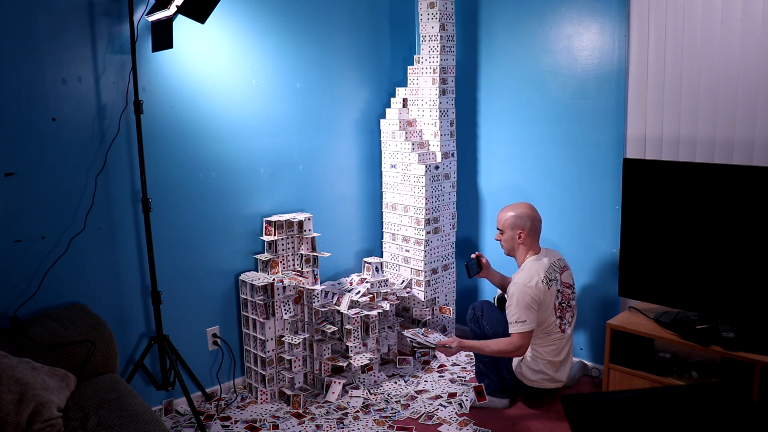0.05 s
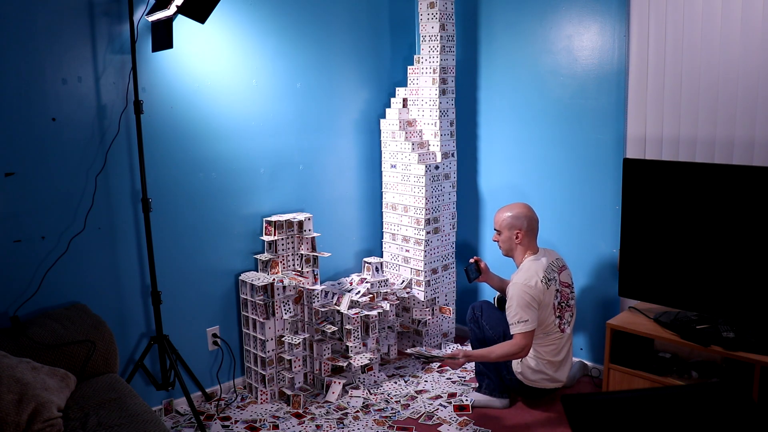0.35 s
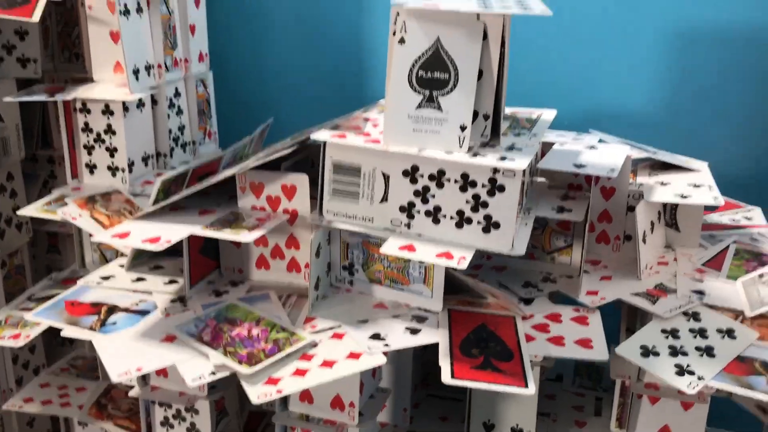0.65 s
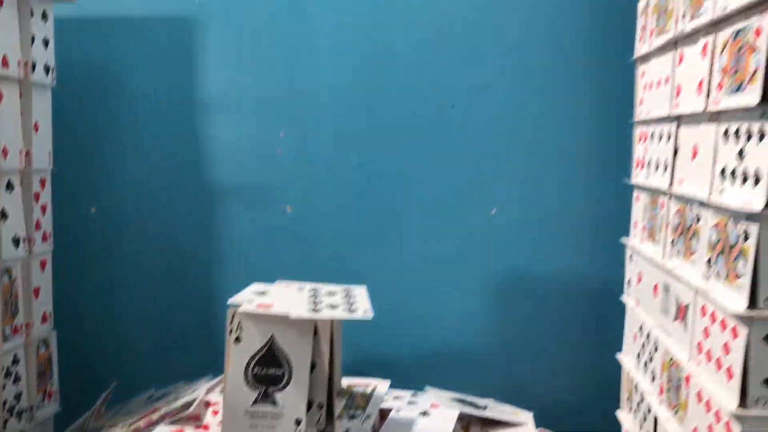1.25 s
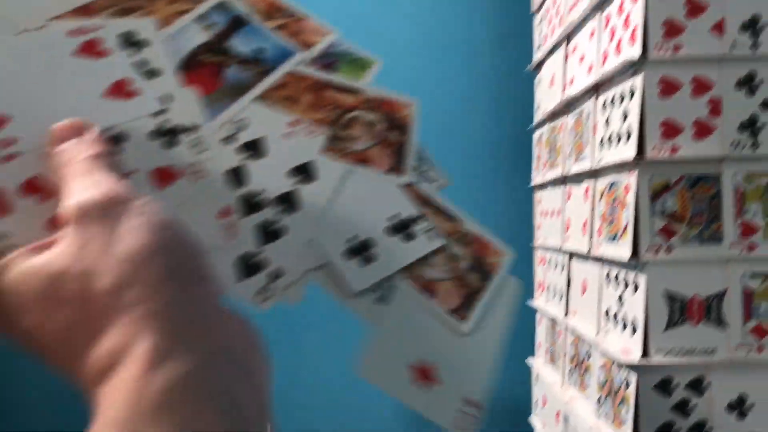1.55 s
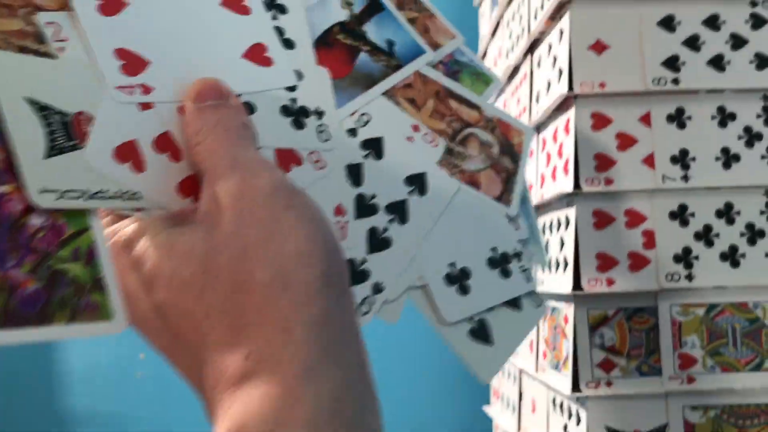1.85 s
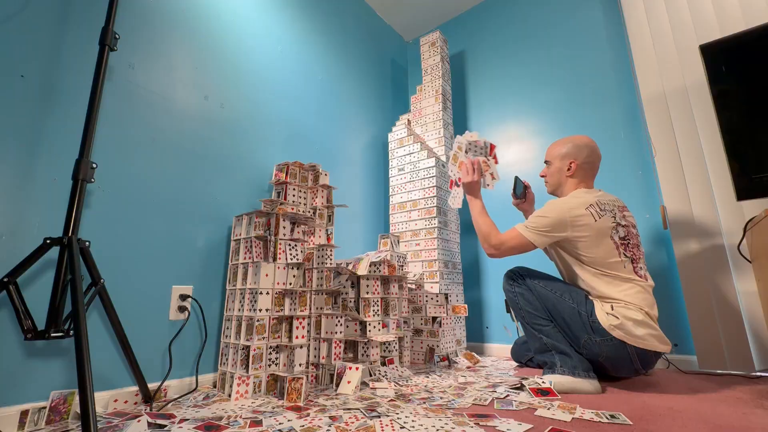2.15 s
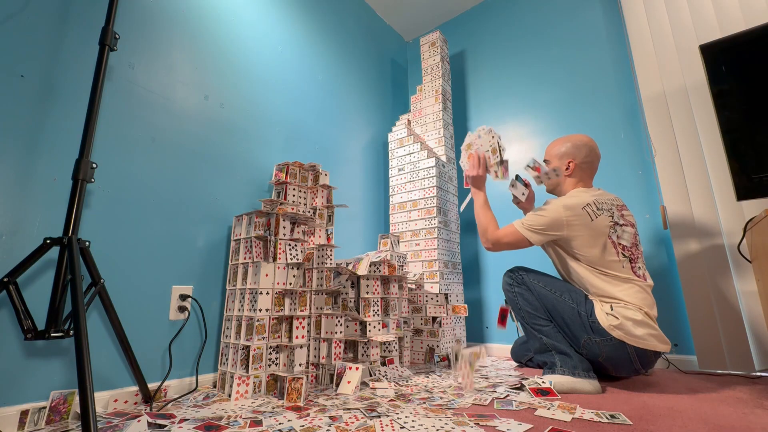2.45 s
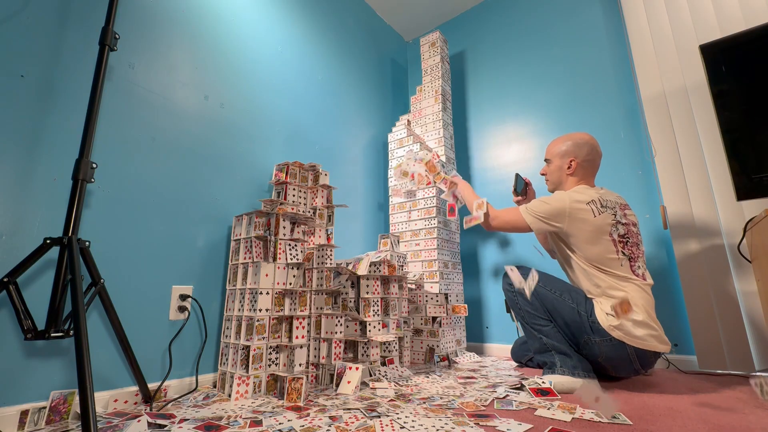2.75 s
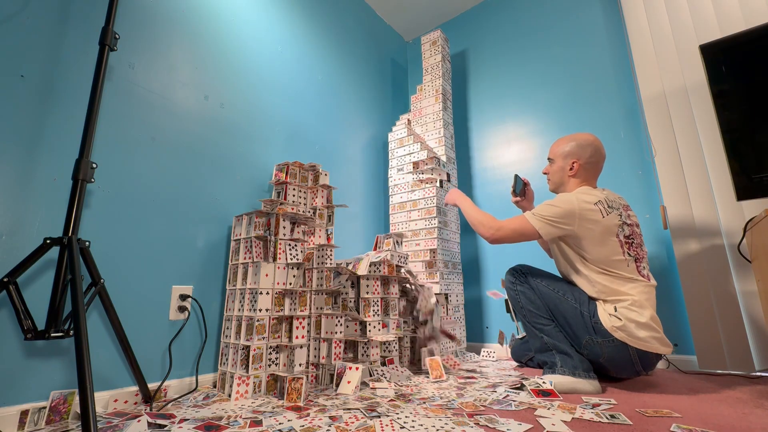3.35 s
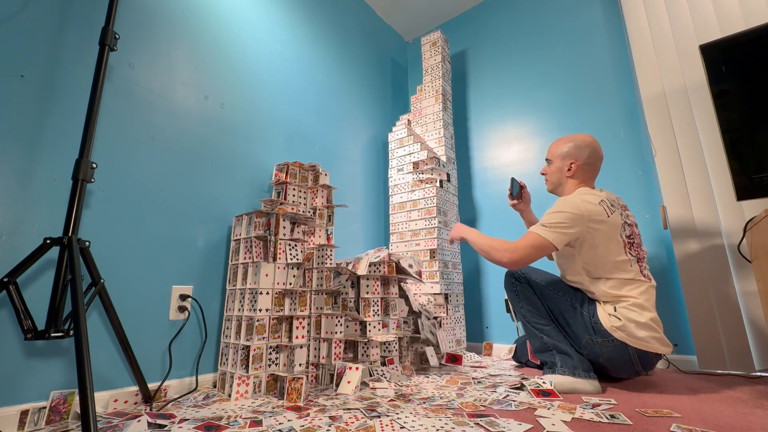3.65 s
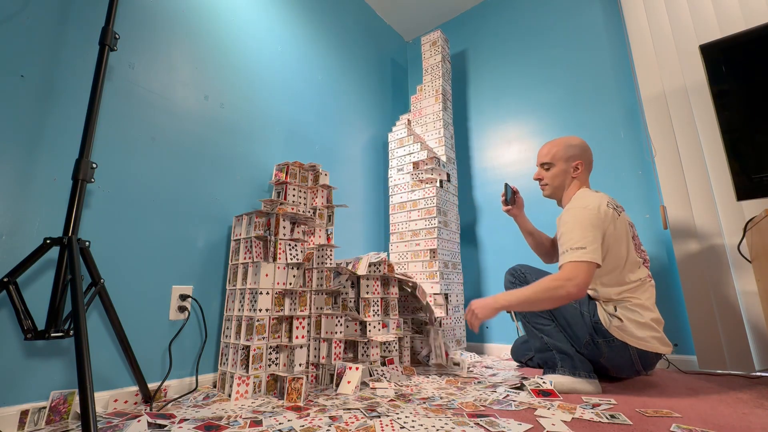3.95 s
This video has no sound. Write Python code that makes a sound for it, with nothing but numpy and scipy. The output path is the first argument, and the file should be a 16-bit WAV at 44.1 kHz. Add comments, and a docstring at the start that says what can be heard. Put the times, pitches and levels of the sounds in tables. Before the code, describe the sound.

Playing cards fall from a tall card house, starting with a short tapping spill that dies by 0.4 seconds. From about 1.3 seconds, cards rustle softly in a hand. A few tick and slap down from 2.2 seconds, with two thuds on the floor. From 2.7 seconds, a dense clatter of sharp clicks continues to the end at 4 seconds. The small room has a faint rumble and hum.

```python
"""Playing cards spill off a tall house of cards in a small, quiet room.
0-0.4 s: a short spill of tapping, clacking cards dies away. From 1.3 s: a fan of cards rustles
in the hand, card slipping on card. From 2.2 s: a few cards tick and slap down; two heavy
landings ring the floor. From 2.7 s: a whole storey gives way, stiff cards striking edge first
in a dense clatter. Throughout: low room rumble, faint hiss and hum."""
import sys
import numpy as np
from scipy import signal
from scipy.fft import rfft, irfft
from scipy.io import wavfile

SR = 44100
rng = np.random.default_rng(int(sys.argv[2]) if len(sys.argv) > 2 else 0)


def to_wav(sig):
    """Store sig (one row per channel, or 1-D mono) as 16-bit WAV at the path in sys.argv[1].

    Samples outside -1..1 are clipped; the rate is SR.
    """
    pcm = np.clip(np.atleast_2d(sig), -1, 1) * 32767
    pcm = np.round(pcm).astype(np.int16)
    wavfile.write(sys.argv[1], SR, pcm.T)  # frames by channels


N = 176400
TIME_S = np.arange(N) / SR

# single card strikes: start_s, rattle_s, relative_db, body_db, edge_db
CLACKS = [(0.048, 0.0058, -31.5, 5, -11), (0.063, 0.0059, -45, 4, -4), (0.097, 0.002, -45, -9, 2),
          (0.117, 0.0087, -32, 5.5, -3), (0.135, 0.0068, -31.5, -6, -4.5), (0.161, 0.0039, -25.5, -2, -10),
          (0.189, 0.0044, -25, -11, -6.5), (0.207, 0.0053, -28, -13, -9.5), (0.286, 0.0079, -46, 0, -15),
          (0.295, 0.0041, -45, 2.5, 0), (2.176, 0.0036, -30.5, -4, -12.5), (2.32, 0.0035, -35.5, -4, -6.5),
          (2.365, 0.0046, -46.5, 0, -3), (2.4203, 0.0048, -33.5, 2.5, -10),
          (2.458, 0.0038, -40.5, -2, -8.5), (2.5126, 0.0038, -32, 1, -0.5), (2.562, 0.0083, -28.5, 7.5, -4),
          (2.572, 0.0099, -28.5, 7.5, -5), (2.584, 0.0044, -31, 9.5, 0), (2.631, 0.0083, -25, -4, -7.5),
          (2.675, 0.0022, -42, -6, 0), (2.703, 0.0081, -22, -5, -8), (2.714, 0.0054, -25, 4, -11),
          (2.729, 0.0094, -22.5, 2, -6.5), (2.772, 0.0083, -34, -4, -5), (2.799, 0.002, -33, 7, -5),
          (2.832, 0.0052, -25, 3, -4.5), (2.878, 0.0078, -28.5, 0, -1.5), (2.897, 0.0026, -26.5, 2.5, -4),
          (2.972, 0.0035, -21.5, -7, -30), (3.011, 0.0022, -18, -8, -15), (3.067, 0.0056, -23.5, 2.5, -14),
          (3.124, 0.0032, -20, -21, -8.5), (3.184, 0.0033, -19.5, -2, -8.5), (3.228, 0.0024, -29, 5, -1),
          (3.244, 0.0037, -18, -9, -14), (3.2757, 0.0066, -28.5, 6, -7), (3.304, 0.0082, -25.5, -8, -2),
          (3.319, 0.0035, -23, 0.5, -6.5), (3.392, 0.0029, -29.5, 6, -2.5), (3.438, 0.0072, -24.5, 7, -3),
          (3.455, 0.004, -25, -0.5, -2.5), (3.472, 0.0017, -29, -17, -12), (3.508, 0.002, -46, 4, -4),
          (3.523, 0.0051, -27, -2, -6), (3.553, 0.0088, -31, 5, -2), (3.572, 0.0031, -19, -5, -12),
          (3.611, 0.0036, -31, 9.5, -4), (3.664, 0.004, -22.5, 2, -10), (3.677, 0.0048, -30, 1, -4),
          (3.694, 0.0077, -30, 2, -4), (3.709, 0.0034, -27, 3, 0), (3.781, 0.0074, -24, 2, -11.5),
          (3.789, 0.0033, -28, 6, -6), (3.827, 0.0048, -23.5, -6, -8), (3.844, 0.0047, -24.5, -3.5, -11),
          (3.872, 0.0023, -28, -12, -16), (3.913, 0.0097, -22.5, -3.5, -8), (3.929, 0.007, -24, 0.5, -6),
          (3.957, 0.00076, -30.5, 2, -3), (3.969, 0.0062, -24, -5, -8)]
# strike spectrum: freq_hz, gain_db
CLACK_COLOUR = [(60, -20), (250, -3.5), (600, -5), (1500, -1.5), (2500, -1), (3400, 3.5), (4200, 2),
                (5000, -0.5), (7000, -2.5), (10000, -8.5), (12500, -9.5), (16000, -21)]
# flows of tumbling cards: time_s, relative_db
SPILL_ENVELOPE = [(0, -39.5), (.024, -46), (.034, -37.5), (.052, -32.5), (.085, -37.5), (.112, -37),
                  (.125, -34.5), (.19, -28), (.245, -42), (.27, -55), (.34, -50.5)]
COLLAPSE_ENVELOPE = [(2.7, -30), (2.745, -26.5), (2.815, -31.5), (2.9, -31.5), (2.935, -39.5), (2.99, -30),
                     (3.04, -30.5), (3.11, -29.5), (3.21, -28), (3.3, -25.5), (3.345, -33), (3.38, -24.5),
                     (3.49, -33), (3.56, -28.5), (3.6, -35.5), (3.65, -28), (3.75, -29.5), (3.81, -32),
                     (3.855, -33.5), (3.9, -35.5), (3.925, -29.5), (4, -33)]
# flow spectra: freq_hz, gain_db
SPILL_COLOUR = [(80, -16), (300, 6), (550, -4.5), (900, 0.5), (2300, -1.5), (3500, 3.5), (4300, -4),
                (5200, -10), (7000, -10.5), (10000, -15.5), (16000, -20)]
COLLAPSE_COLOUR = [(59, -39), (100, -13), (123, -18), (149, -15.5), (218, -5), (270, -3.5), (487, 1),
                   (668, -6), (808, 0), (936, -0.5), (1800, -1), (3320, 0), (4960, -10), (12000, -20.5),
                   (15500, -24.5)]
# packets landing flat: start_s, relative_db, pitch_hz, decay_s
SLAPS = [(.032, -38, 670, 0.032), (2.176, -26.5, 390, 0.0046), (2.186, -41.5, 473, 0.024),
         (2.422, -33.5, 640, 0.0099), (2.563, -24.5, 386, 0.011), (2.573, -26.5, 330, .012),
         (2.585, -26.5, 477, 0.0095), (2.602, -34, 330, 0.027), (2.633, -26.5, 384, 0.0086),
         (2.704, -31, 1000, .008), (2.714, -26, 700, 0.0087), (2.732, -26.5, 715, 0.015),
         (2.765, -30, 770, 0.051), (3.228, -28.5, 534, 0.014), (3.243, -24.5, 530, 0.01),
         (3.30, -33.5, 503, 0.035), (3.44, -28, 433, 0.0092), (3.454, -24.5, 450, 0.0053),
         (3.642, -31, 673, 0.014), (3.662, -40, 605, 0.0089), (3.785, -36.5, 403, 0.026),
         (3.848, -32.5, 430, 0.0078), (3.872, -29.5, 400, .005)]
# square edge landings: start_s, relative_db, pitch_hz
PINGS = [(0.161, -24, 3070), (.189, -25, 3460), (2.974, -19.5, 3190), (3.011, -17, 3440),
         (3.123, -18, 3505), (3.245, -14, 3070), (3.573, -16, 3184), (3.872, -22.5, 3310),
         (3.913, -23, 3500), (3.931, -22, 2790)]
# corners flicking past each other: start_s, relative_db
FLICKS = [(.063, -14), (.1195, -10), (.161, -7), (0.296, -15), (2.3217, -11.5), (2.4207, -16), (2.483, -26),
          (2.5135, -22), (2.586, -6), (2.705, -2), (2.984, -9), (3.125, -3), (3.4435, 2.5), (3.456, -3),
          (3.572, -1), (3.584, -3), (3.6975, 0), (3.7095, 1), (3.828, -1), (3.931, 4.5), (3.986, -5)]
# flick spectrum: freq_hz, gain_db
FLICK_COLOUR = [(1000, -27), (4000, -14), (7000, -5), (12000, 1), (16000, 2)]
# heavy landings: start_s, level_db
KNOCKS = [(2.178, -35), (2.565, -24.5)]
# floor modes: freq_hz, gain_db, t60_s
FLOOR_MODES = [(222, -0.5, 0.29), (299, -5.5, 0.27), (479, -7, 0.14)]
# cards sliding in the hand: peak_s, level_db, rise_s, decay_s, treble_db
RUBS = [(1.36, -59, 0.012, 0.079, -5), (1.58, -60, 0.024, 0.026, 10), (1.627, -47.5, 0.015, 0.013, -17),
        (1.705, -54.5, 0.037, 0.025, 6), (1.78, -58.5, .04, 0.11, -2), (1.972, -52, .004, 0.023, -8),
        (2.005, -47, .015, 0.015, -11), (2.07, -56.5, 0.0089, 0.068, 7), (2.125, -55, .02, 0.057, -1),
        (2.284, -48.5, .005, 0.023, 0), (2.485, -52, .005, 0.033, 16), (2.53, -45, 0.015, 0.025, -20)]
# sliding spectrum: freq_hz, gain_db
RUB_COLOUR = [(100, -14), (700, -1), (1600, -0.5), (2600, -0.5), (3600, 4.5), (5000, -6), (9000, -12),
              (16000, -21)]
# room decay: freq_hz, t60_s
ROOM_DECAY = [(150, 0.46), (500, 0.44), (1500, 0.32), (3600, 0.42), (8000, 0.33), (16000, 0.34)]
# room rumble and hiss spectrum: freq_hz, gain_db
RUMBLE_COLOUR = [(12, -51), (20, -14), (42, -23), (59, -8), (98, -6.5), (129, -2), (180, -8.5),
                 (238, -11.5), (324, -16.5), (393, -20.5), (505, -19), (565, -29.5), (667, -28), (725, -32),
                 (906, -35), (2330, -43), (3640, -45), (5690, -53.5), (15500, -58)]
# room tones: freq_hz, level_db
HUM_TONES = [(70, -58), (140, -59), (177.3, -50), (15009, -87)]


def clacks(size=4096, rattle_per_s=5000, scrape_s=0.0035, gain_db=32, wet_db=-3.5):
    """A card hits edge first and chatters for milliseconds; the room takes it as one blow."""
    near, blows, hz = np.zeros(N), np.zeros(N), bins()
    body_hz, ring_hz, edge_hz = 1930, 3400, 5830
    lead = size // 8
    t = (np.arange(size) - lead) / SR
    for start_s, rattle_s, db, body_db, edge_db in CLACKS:
        # a tumbling card scrapes its neighbours just before it strikes
        tumbling = start_s < SPILL_ENVELOPE[-1][0] or start_s > COLLAPSE_ENVELOPE[0][0]
        scrape = tumbling * 0.49 * np.exp(-abs(t) / scrape_s)
        age = np.maximum(t, 0) / max(rattle_s, .001)
        rattle = (.5 + 2 * age) * np.exp(-1.8 * age)
        hits = impulses(size, rattle_per_s) * np.where(t < 0, scrape, rattle)
        hits[lead] = 1.02  # main contact
        tint_db = read([(body_hz, body_db), (ring_hz, 0), (edge_hz, edge_db)], hz)
        card = amp(db + gain_db) * flex(ring(read(CLACK_COLOUR, hz) + tint_db))
        add(near, start_s + t[0], through(unit_energy(hits), card))
        add(blows, start_s, card)
    return near + amp(wet_db) * room(blows)


def flow(envelope, colour, gain_db, cards=20, taps_per_s=1800, spread_db=2, clump_db=2.26):
    """Many cards tap each other in clumps, each card with its own tint."""
    times_s, db = np.transpose(envelope)
    hz, out = bins(), np.zeros(N)
    knots_hz = np.geomspace(200, 16000, 22)
    for _ in range(cards):
        tap_db = spread_db * np.pi * np.tanh(rng.exponential(1, N) / np.pi)
        taps = amp(tap_db) * rng.choice([-1, 1], N)
        tint_db = 4 * np.interp(hz, knots_hz, rng.standard_normal(len(knots_hz)))
        card = flex(ring(read(colour, hz) + tint_db))
        out += through(taps * chance(N, taps_per_s / cards), unit_energy(card))
    start_s, end_s = times_s[0], times_s[-1]
    gate = np.interp(TIME_S, [start_s - .002, start_s + .0022, end_s, end_s + .037], [0, 1, 1, 0])
    level_db = gain_db + np.interp(TIME_S, times_s, db) + clump_db * drift(rate_hz=61)
    return unit_rms(out) * gate * amp(level_db)


def slaps(size=8192, width_oct=0.57, skirt_db=-21, low_cut_hz=170, wet_db=-7.5):
    """A packet lands flat: many soft contacts in a short, hollow thud."""
    near, blows, hz, t = np.zeros(N), np.zeros(N), bins() + 20, np.arange(size) / SR
    for start_s, db, pitch_hz, decay_s in SLAPS:
        octaves = np.log2(hz / pitch_hz)
        peak_db = np.maximum(-3 * (octaves / width_oct) ** 2, skirt_db - 6 * abs(octaves))
        hollow = ring(peak_db - 10 * np.log10(1 + (low_cut_hz / hz) ** 4))
        hits = impulses(size, per_s=1500) * np.exp(-t / decay_s)
        hits[0] = 1.87  # main contact
        strength = amp(db) * np.sqrt(decay_s * SR)
        add(near, start_s, strength * unit_energy(through(hits, hollow)))
        add(blows, start_s, strength * unit_energy(hollow))
    return near + amp(wet_db) * room(blows)


def pings(size=2048, rise_s=0.0011, decay_s=0.0029, upper_ratio=1.1, upper_db=-9.5):
    """A stiff card lands squarely on an edge: two close modes ring briefly."""
    out, t = np.zeros(N), np.arange(size) / SR
    envelope = (1 - np.exp(-t / rise_s)) * np.exp(-t / decay_s)
    for start_s, db, pitch_hz in PINGS:
        phase = 2 * np.pi * pitch_hz * t
        modes = np.sin(phase) + amp(upper_db) * np.sin(upper_ratio * phase)
        add(out, start_s, 2 * amp(db) * modes * envelope)
    return out


def flicks(size=1024, decay_s=0.00042):
    """A stiff corner snaps free: a thin, very short tick."""
    out, t = np.zeros(N), np.arange(size) / SR
    corner = ring(read(FLICK_COLOUR, bins()))
    for start_s, db in FLICKS:
        snap = rng.standard_normal(size) * np.exp(-t / decay_s)
        add(out, start_s, .5 * amp(db) * unit_energy(through(snap, corner)))
    return out


def knocks(rise_s=0.0052):
    """The floor rings briefly under a heavy landing."""
    out, t = np.zeros(N), np.arange(SR // 2) / SR
    boom = sum(amp(db - 60 * t / t60_s) * np.sin(2 * np.pi * hz * t) for hz, db, t60_s in FLOOR_MODES)
    for start_s, db in KNOCKS:
        add(out, start_s, amp(db) * boom * (1 - np.exp(-t / rise_s)))
    return out


def rubs(slips_per_s=3500):
    """Card slides on card: fine slips under a short swell."""
    out, hz = np.zeros(N), bins()
    for peak_s, db, rise_s, decay_s, treble_db in RUBS:
        slips = rng.standard_normal(N) * chance(N, slips_per_s)
        swell = np.exp(-np.maximum((peak_s - TIME_S) / rise_s, (TIME_S - peak_s) / decay_s))
        rasp = ring(read(RUB_COLOUR, hz) + read([(2200, 0), (6000, treble_db)], hz))
        out += amp(db) * swell * unit_rms(through(slips, rasp))
    return out


def flex(response, bend_s=0.001103, scatter_s=0.000338):
    """A bending card spreads a click: lows travel slower, each part answers a little late."""
    hz = bins(len(response))
    knots_hz = np.geomspace(200, 16000, 26)
    lag_s = scatter_s * np.interp(hz, knots_hz, rng.exponential(1, len(knots_hz)))
    delay_s = bend_s / np.sqrt(1 + hz / 1000) + lag_s
    return irfft(rfft(response) * np.exp(-2j * np.pi * np.cumsum(delay_s) * hz[1]))


def room(x, places=7, places_per_s=20, predelay_s=.003):
    """A short diffuse tail that changes as cards land in different places."""
    out = np.zeros(N)
    for k in range(places):
        reflections = impulses(SR // 2, per_s=6000)
        reflections[:round(predelay_s * SR)] = 0
        hz, t, spectra = signal.stft(reflections, SR, nperseg=256)
        decay = amp(-60 * t / read(ROOM_DECAY, hz)[:, None])
        tail = signal.istft(spectra * decay, SR)[1]
        place = (TIME_S * places_per_s - k) % places
        crossfade = np.sin(np.pi * place / 2) * (place < 2)
        out += through(x * crossfade, unit_energy(tail))
    return out


def background(rumble_db=-41.5, hiss_db=-72, hiss_hz=3700, half_width_hz=340, waver_rad=0.82):
    """Low rumble, a faint band of hiss and a wavering hum."""
    hz = bins(N)
    rumble = noise(amp(read(RUMBLE_COLOUR, hz)))
    hiss = noise(1 / (1 + ((hz - hiss_hz) / half_width_hz) ** 2))
    hum = np.zeros(N)
    for freq_hz, db in HUM_TONES:
        phase = 2 * np.pi * freq_hz * TIME_S + waver_rad * drift(rate_hz=2.8)
        hum += amp(db) * np.sqrt(2) * np.sin(phase)
    return amp(rumble_db) * rumble + amp(hiss_db) * hiss + hum


def amp(db):
    return 10 ** (np.asarray(db) / 20)


def unit_rms(x):
    return x / np.sqrt(np.mean(x ** 2) + 1e-20)


def unit_energy(x):
    return x / np.linalg.norm(x)


def read(points, hz):
    """Table lookup on a log-frequency axis."""
    knots_hz, values = np.transpose(points)
    return np.interp(np.log(hz + 1), np.log(knots_hz + 1), values)


def bins(size=2048):
    return np.fft.rfftfreq(size, 1 / SR)


def ring(db):
    """Minimum-phase impulse response of a dB spectrum."""
    cepstrum = irfft(np.log(amp(db)))
    half = len(cepstrum) // 2
    cepstrum[1:half] *= 2
    cepstrum[half + 1:] = 0
    return irfft(np.exp(rfft(cepstrum)))


def through(x, response):
    return signal.fftconvolve(x, response)[:len(x)]


def add(mix, start_s, sound):
    part = mix[max(0, round(start_s * SR)):][:len(sound)]
    part += sound[:len(part)]


def chance(size, per_s):
    """Mask of random events."""
    return rng.random(size) < per_s / SR


def impulses(size, per_s):
    return rng.choice([-1., 1.], size) * chance(size, per_s)


def noise(gains):
    """Spectrally shaped noise, rms 1."""
    return unit_rms(irfft(rfft(rng.standard_normal(N)) * gains, N))


def drift(rate_hz):
    """Slow random motion, rms 1."""
    return noise(np.exp(-(bins(N) / rate_hz) ** 2))


def scene():
    """All the cards in the room, mono."""
    spill = flow(SPILL_ENVELOPE, SPILL_COLOUR, gain_db=-4)
    collapse = flow(COLLAPSE_ENVELOPE, COLLAPSE_COLOUR, gain_db=-1)
    rustle = spill + collapse + rubs()
    ticks, rings = flicks(), pings()
    echoes = room(amp(-4) * rustle + amp(-11) * ticks + amp(-4) * rings)
    return (clacks() + slaps() + knocks() + rustle + ticks + rings + echoes + background())[None]


def record(dry, cutoff_hz=15850):
    """Steep low-pass."""
    lowpass = signal.firwin(511, cutoff_hz, window=("kaiser", 9), fs=SR)
    return signal.oaconvolve(dry, lowpass[None], "same")


dry = scene()
out = record(dry)
to_wav(out)
```